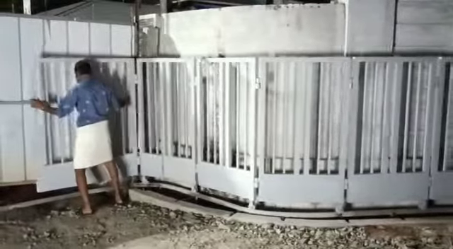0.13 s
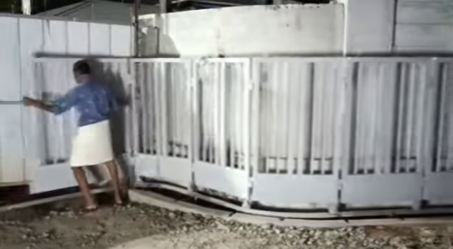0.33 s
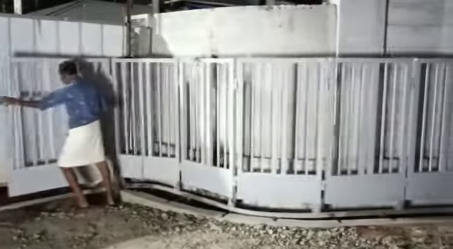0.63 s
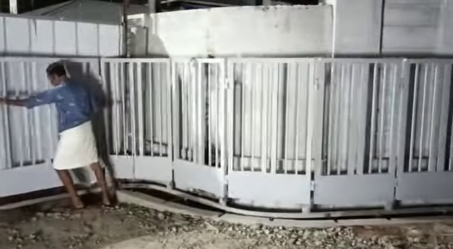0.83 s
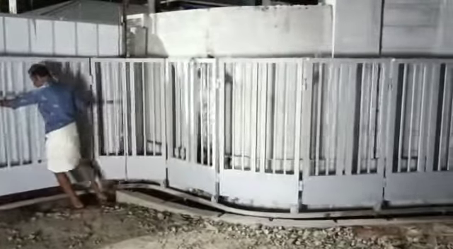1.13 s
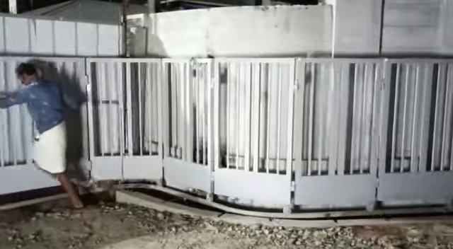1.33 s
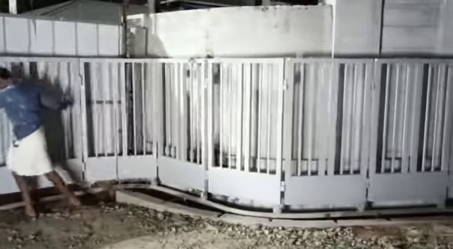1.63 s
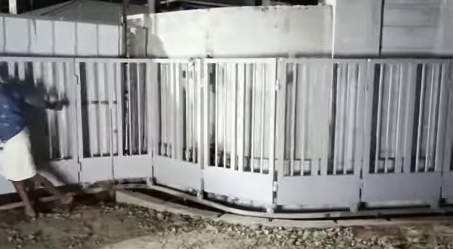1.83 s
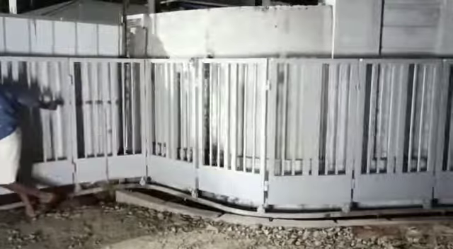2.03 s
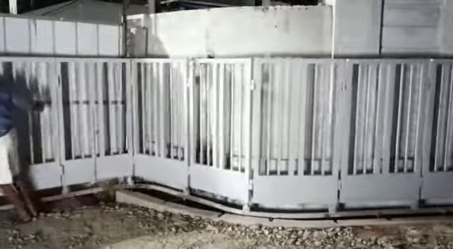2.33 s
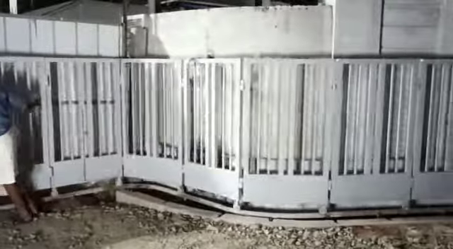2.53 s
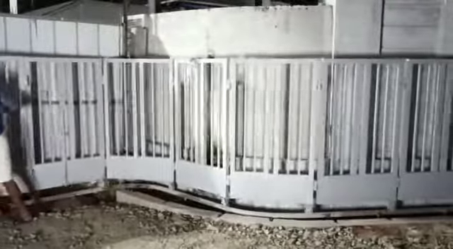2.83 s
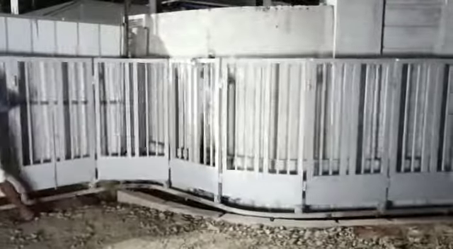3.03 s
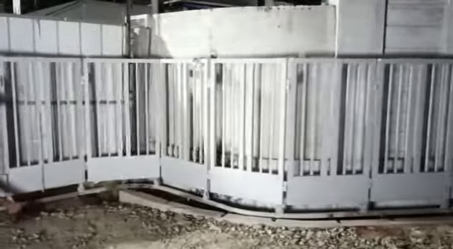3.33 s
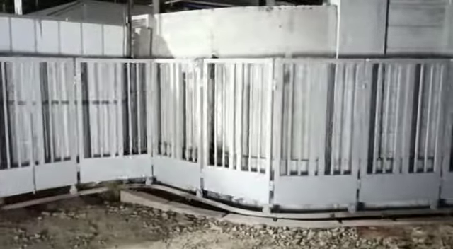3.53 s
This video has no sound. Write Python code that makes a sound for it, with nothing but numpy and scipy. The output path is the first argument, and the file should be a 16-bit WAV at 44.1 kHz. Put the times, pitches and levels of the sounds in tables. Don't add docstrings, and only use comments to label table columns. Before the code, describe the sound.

A steel folding gate is pulled along a ground rail outdoors at night, wheels rumbling and bars rattling; small jolts lead to a hard clank, then louder rolling, heard by a phone a few metres away.

```python
import sys
import numpy as np
from scipy import signal
from scipy.fft import rfft, irfft
from scipy.io import wavfile
from scipy.ndimage import uniform_filter1d

SR = 44100
rng = np.random.default_rng(int(sys.argv[2]) if len(sys.argv) > 2 else 0)


def rack_gain(trim_db):
    fader = np.asarray(trim_db, float)
    return 10 ** (fader / 20)


def materialize(psi):
    bounded = np.clip(np.atleast_2d(psi).T, -1, 1)
    quanta = np.round(bounded * 32767).astype(np.int16)
    wavfile.write(sys.argv[1], SR, quanta)


N = 162288

# frequency in Hz, density in dB per Hz.
NIGHT_AIR = [(30, -20), (55, -23), (80, 8.5), (110, -13), (500, -8.5), (3300, -29), (8600, -64)]
# time in seconds, wheel rumble in dB, frame roar in dB, chatter in dB.
ROLLING = [(0, -34, -51, -48.5), (.1, -41, -51.5, -48.5), (.28, -36.5, -46, -48), (.67, -36, -43.5, -45.5),
           (.95, -36, -44, -45), (1.2, -35.5, -46, -50), (1.55, -37, -43, -47), (1.8, -39, -46.5, -50.5),
           (2.0, -36.5, -43, -44.5), (2.15, -32.5, -42, -44.5), (2.46, -31.5, -37.5, -39),
           (2.55, -32, -38, -43), (2.9, -30.5, -38.5, -40.5), (3.129, -32, -39, -44),
           (3.4, -29.5, -37.5, -39), (3.68, -29, -35.5, -40)]
# frequency in Hz, width in Hz, level in dB.
SHEET_MODES = [(102.5, 22, -5.5), (142, 21, -2), (169.9, 18.4, 0), (196.4, 18, -1), (231, 27.3, 1),
               (281.8, 22, -2), (332, 20.6, -2.5), (360.7, 18.5, -2.5), (395.5, 37.4, -1), (449.3, 18, -9)]
# frequency in Hz, width in Hz, level in dB.
FRAME_MODES = [(631, 90, -3.5), (742, 146, -1.5), (840.5, 92, 0), (878.5, 30, -1.5), (1014, 83, -5),
               (1119, 18.4, -7), (1205, 79, -7.5)]
# frequency in Hz, width in Hz, level in dB.
PANEL_MODES = [(1362, 530, 1.5), (1490, 81, 1.5), (1670, 75, -3), (1808, 49, -0.5), (1902, 160, 1.5),
               (2234, 160, -3), (2313, 41, -4.5), (2398, 130, -3), (2574, 60, -5), (2738, 34, -8.5)]
# frequency in Hz, width in Hz, level in dB.
BAR_MODES = [(2930, 310, 0.5), (3220, 59, 1), (3443, 72, 1), (3504, 230, 1.5), (3823, 250, 3.5),
             (4103, 70, -1.5), (4296, 67, -2.5), (4635, 150, -1), (5110, 590, -6), (6090, 400, -6.5)]
# frequency in Hz, width in Hz, level in dB.
PIN_MODES = [(6270, 100, -12), (6395, 85, 1.5), (6810, 110, 4), (7070, 130, -5.5), (7330, 63, 2),
             (7340, 28, 5), (7510, 240, 2), (8380, 190, -3)]
CHATTER_LEVELS = [-1, -5.5, -12]
SHAKE_LEVELS = [-10, -7.5, -9]
# start in seconds, panel, bar and pin levels in dB, shake decay (time to fall 95 dB) in
# seconds.
JOINT_JOLTS = [(0.2998, -36.5, -40.5, -54, 0.36), (0.3313, -40, -41, -52, 0.21),
               (0.4437, -38, -40.5, -48.5, 0.5), (0.67, -43, -42, -42, 0.39),
               (0.692, -34, -40, -50.5, 0.27), (0.8162, -48, -43.5, -46.5, 0.57),
               (1.022, -42, -37.5, -44.5, 0.66), (1.0862, -44, -39.5, -45, 0.21),
               (1.191, -37, -46.5, -51, 0.22), (1.286, -36, -44, -55.5, 0.36), (1.575, -41, -44, -56, 0.37),
               (2.544, -42.5, -41.5, -47, 0.24), (1.3636, -37.5, -42, -46, 0.3),
               (1.5252, -40, -40.5, -42.5, 0.4), (1.6466, -39, -37, -36.5, 0.38),
               (1.926, -31.5, -32.5, -34.5, 0.47), (2.2432, -17.5, -23.5, -27.5, 0.44),
               (2.295, -27, -39.5, -32, 0.72), (2.3675, -32, -29, -34, 0.44),
               (2.5668, -51, -35, -38.5, 0.42), (2.65, -34.5, -36, -38.5, 0.57),
               (2.8683, -31.5, -32.5, -36.5, 0.48), (2.931, -35, -32.5, -32.5, 0.21),
               (3.218, -29.5, -34.5, -41.5, 1), (3.3645, -28, -36, -29.5, 0.28),
               (3.4697, -41, -33, -41, 0.24), (3.587, -40, -31, -33, 0.4)]
BLOW_LEVELS = [-9, -4, 0]
# centre in seconds, frequency in Hz, level in dB,
# length in seconds.
SHEET_BOOMS = [(.312, 164, -47, 0.18), (0.673, 221, -45.5, .15), (1.551, 202, -41, .15),
               (1.605, 398, -40.5, .1), (1.846, 194, -42, 0.21), (2.083, 293, -36, 0.062),
               (2.153, 212, -43.5, 0.2), (2.29, 818, -39.5, 0.11), (2.299, 355, -35.5, .12),
               (2.43, 231, -33.5, .1), (2.485, 178, -34, 0.092), (2.657, 334, -35, 0.092),
               (2.684, 400, -39.5, 0.2), (2.752, 285, -36.5, 0.047), (2.806, 170, -36, 0.18),
               (2.91, 326, -31, 0.056), (2.947, 243, -31.5, 0.11), (3.06, 328, -34, 0.11),
               (3.174, 415, -37.5, .08), (3.228, 188, -31.5, 0.053), (3.381, 140, -34.5, .2),
               (3.401, 888, -39, 0.073), (3.425, 196, -31, 0.15), (3.493, 164, -33.5, 0.14),
               (3.584, 229, -43, .12), (3.635, 657, -37.5, 0.068), (3.636, 334, -31.5, .07),
               (3.673, 184, -29, .06)]
# start in seconds, level in dB, struck place as its loudest Hz,
# reach in octaves.
FORK_KNOCKS = [(1.6, -38, 2200, 0.091), (1.651, -39.5, 1670, 0.049), (1.677, -40, 1710, 0.21),
               (2.2421, -16, 2200, 2), (2.2466, -20.5, 2300, 0.12), (2.26, -26, 1670, .1),
               (2.285, -26.5, 1800, 0.87), (2.367, -28.5, 3020, 0.41), (3.193, -33.5, 2140, 0.32),
               (3.222, -30, 850, 0.31), (3.374, -28.5, 2160, 0.24), (2.252, -25.5, 1139, 0.38),
               (2.24, -32.5, 2700, 0.088), (2.261, -27, 2040, .08), (1.662, -40, 2300, .08),
               (3.405, -33.5, 2130, 0.23), (.335, -47, 3600, .3)]
# frequency in Hz, width in Hz, level in dB.
FORK_MODES = [(880, 130, 5), (1140, 33, 1.5), (1480, 40, -6), (1665, 15, 2), (1766, 48, 5),
              (1980, 14, -8.5), (2040, 20, -4), (2217, 45, -9), (2330, 46, -1), (2650, 60, -8),
              (2707, 16, -8.5), (3530, 30, -6), (3900, 67, -3.5), (4105, 20, -4)]
# start in seconds, level in dB, length in seconds.
PIN_SCRAPES = [
    (.445, -44.5, 0.015),
    (0.667, -41.5, .018),
    (0.701, -40, 0.02),
    (1.644, -34, 0.025),
    (2.241, -26, .012),
    (3.361, -34, 0.015),
    (3.37, -29, 0.019),
    (2.87, -42.5, 0.028),
    (3.588, -43.5, 0.012),
]
# frequency in Hz, width in Hz, level in dB.
SCRAPE_MODES = [(6520, 260, -5), (6840, 66, -9), (7330, 250, 5.5), (7920, 250, -0.5), (8415, 130, -3)]
# start in seconds, level in dB, length in seconds.
FRAME_RAPS = [
    (2.366, -27, 0.011),
    (2.711, -32.5, .009),
    (3.216, -39, 0.011),
    (1.926, -38.5, 0.019),
]
# frequency in Hz, likeness from 0 to 1.
STEREO_LIKENESS = [(60, .98), (250, 0.98), (500, 0.74), (2000, 0.043)]
# frequency in Hz, left minus right in dB.
STEREO_LEAN = [(1290, 0), (2380, -3), (4400, -1), (8120, 2.5), (12000, -9)]
# frequency in Hz, level in dB.
TOP_BAND = [(11600, 0), (12700, -9), (13000, -2.5), (15300, -3)]

DETUNE, COLOUR_DB = .008, 3
EDGE_HZ = 8620


def evened(x):
    return x / np.sqrt(np.mean(x ** 2) + 1e-20)


def read(points, hz):
    f, value = np.transpose(points)
    return np.interp(np.log(hz + 1), np.log(f + 1), value)


def effort(column):
    rows = np.array(ROLLING)
    return rack_gain(np.interp(np.arange(N) / SR, rows[:, 0], rows[:, column]))


def wander(hz):
    t = np.arange(N) / SR
    rates = hz * np.geomspace(.1, 1, num=16)
    return evened(sum(np.sin(2 * np.pi * (f * t + rng.random())) / np.sqrt(f) for f in rates))


def ring(modes, detune=0., colour_db=0.):
    hz, width, db = np.transpose(modes)[:, :, None]
    t = np.arange(4096) / SR
    colour, shift = rng.standard_normal((2, len(modes), 1))
    sign = (-1.) ** np.arange(len(modes))[:, None]
    level = sign * np.sqrt(width) * rack_gain(db + colour_db * colour)
    decay = np.exp(-np.pi * width * t)
    out = (level * decay * np.sin(2 * np.pi * hz * (1 + detune * shift) * t)).sum(0)
    return out / np.linalg.norm(out)


def through(drive, modes):
    return signal.oaconvolve(drive, ring(modes)[None])[:, :N]


def add_at(out, start_s, sound):
    at = int(start_s * SR)
    out[:, at:at + sound.shape[1]] += sound


def night():
    hz = np.fft.rfftfreq(N, 1 / SR)
    air = rfft(rng.standard_normal((2, N)), axis=1) * rack_gain(read(NIGHT_AIR, hz))
    return rack_gain(-45) * evened(irfft(air, N, axis=1))


def wheels():
    lumps, swells = rng.standard_normal((2, 2, N))
    rumble = evened(through(lumps * rack_gain(.7 * wander(hz=29.76)), SHEET_MODES))
    roar = evened(through(swells * rack_gain(1.2 * wander(hz=24.98)), FRAME_MODES))
    return effort(column=1) * rumble + effort(column=2) * roar


def chatter():
    ticks_per_s, tick_spread_db, grit_db, flutter_db, shake_curve = 1100, 3.5, 3, 1.8, 1.5
    t, out = np.arange(N) / SR, np.zeros((2, N))
    for k, modes in enumerate([PANEL_MODES, BAR_MODES, PIN_MODES]):
        power = (effort(column=3) * rack_gain(CHATTER_LEVELS[k] + flutter_db * wander(hz=20))) ** 2
        for row in JOINT_JOLTS:
            start, shake_s = row[0], row[4]
            fall_db = 95 * (np.abs(t - start) / shake_s) ** shake_curve
            power = power + (t > start) * rack_gain(row[k + 1] + SHAKE_LEVELS[k] - fall_db) ** 2
        strength = rack_gain(tick_spread_db * rng.exponential(1, (2, N)))
        ticks = (rng.random((2, N)) < ticks_per_s / SR) * strength * rng.choice([-1, 1], (2, N))
        drive = evened(ticks) + rack_gain(grit_db) * rng.standard_normal((2, N))
        out += through(evened(drive) * np.sqrt(power), modes)
    return out


def clanks():
    decay_s, rise_s = [.1, .076, .066], [.0087, .0067, .0036]
    grain_db = 3
    t, out = np.arange(3072) / SR, np.zeros((2, N + 8192))
    for row in JOINT_JOLTS:
        for k, modes in enumerate([PANEL_MODES, BAR_MODES, PIN_MODES]):
            grain = 13 * uniform_filter1d(rng.standard_normal(len(t)), size=36)
            blow = evened(rng.standard_normal((2, len(t))) * rack_gain(grain_db * grain))
            fall = rack_gain(row[k + 1] + BLOW_LEVELS[k] - 60 * t / decay_s[k])
            blow = blow * np.minimum(t / rise_s[k], 1) * fall
            add_at(out, row[0], signal.fftconvolve(blow, ring(modes, DETUNE, COLOUR_DB)[None]))
    return out[:, :N]


def booms():
    t, out = np.arange(N) / SR, np.zeros((2, N))
    waver = np.cumsum(1 + .012 * wander(hz=20)) / SR
    for centre, hz, db, length in SHEET_BOOMS:
        swell = np.exp(-2.77 * ((t - centre) / length) ** 2)
        out += rack_gain(db + 2) * swell * np.sin(2 * np.pi * (hz * waver + rng.random((2, 1))))
    return out


def knocks():
    side_db, rise_s = -15, .003
    out, hz = np.zeros((2, N + 8192)), np.array(FORK_MODES)[:, 0]
    for start, db, place_hz, reach in FORK_KNOCKS:
        modes = np.array(FORK_MODES)
        modes[:, 2] -= 6 * (np.log2(hz / place_hz) / max(reach, .05)) ** 2
        pair = np.array([ring(modes), rack_gain(side_db) * ring(modes, .004, 4.1)])
        rise = np.minimum(np.arange(pair.shape[1]) / SR / rise_s, 1)
        add_at(out, start, rack_gain(db + 27) * rise * pair)
    return out[:, :N]


def contacts(table, modes):
    t, out = np.arange(2048) / SR, np.zeros((2, N + 8192))
    for start, db, length in table:
        swell = np.sin(np.pi * np.minimum(t / length, 1) ** .71)
        snap = rng.standard_normal((2, len(t))) * rack_gain(db + 1) * swell
        add_at(out, start, signal.fftconvolve(snap, ring(modes, DETUNE, COLOUR_DB)[None]))
    return out[:, :N]


def pin_scrapes():
    return contacts(PIN_SCRAPES, SCRAPE_MODES)


def bar_raps():
    return contacts(FRAME_RAPS, PANEL_MODES[-2:] + BAR_MODES[1:-2])


def spread(pair):
    hz = np.fft.rfftfreq(N, 1 / SR)
    same, lean = read(STEREO_LIKENESS, hz), rack_gain(read(STEREO_LEAN, hz) / 2)
    a, b = rfft(pair, axis=1)
    mid, side = np.sqrt((1 + same) / 2) * a, np.sqrt((1 - same) / 2) * b
    return irfft([(mid + side) * lean, (mid - side) / lean], N, axis=1)


def scene():
    gate = wheels() + chatter() + clanks() + booms() + knocks() + pin_scrapes() + bar_raps()
    return spread(night() + gate)


def treble_power(z, hz):
    band = irfft(z * ((hz > 4500) & (hz < EDGE_HZ)), N, axis=1)
    power = uniform_filter1d(band ** 2, size=256, axis=1)
    return np.abs(power).mean(0)[None] / power.mean() + 1e-9


def top_hiss(treble, hz):
    cells = signal.stft(rng.standard_normal((2, N)), nperseg=1024)[2]
    fine = uniform_filter1d(rng.standard_normal(cells.shape), size=8, axis=1)
    broad = uniform_filter1d(rng.standard_normal(cells.shape), size=12, axis=1)
    broad = uniform_filter1d(broad, size=4, axis=2)
    cells = cells * rack_gain(4.5 * evened(fine + 2 * broad))
    hiss = evened(signal.istft(cells, nperseg=1024)[1][:, :N])
    linger = uniform_filter1d(np.minimum(treble, 4), size=4096, origin=2000, axis=1)
    hiss = hiss * np.sqrt(1.6 + treble ** 1.45 + 1.9 * linger ** 2)
    return rfft(hiss, axis=1) * rack_gain(-62 + read(TOP_BAND, hz)) * ((hz > 11600) & (hz < 15300))


def edge_leak(dry, treble, hz):
    leak = rfft(dry * treble ** 1.99, axis=1) * (hz > EDGE_HZ) * rack_gain(-62.5 - .015 * (hz - EDGE_HZ))
    gate = uniform_filter1d(1. * (wander(hz=25) > .8), size=512)
    spill = rfft(rng.standard_normal(dry.shape) * gate, axis=1)
    return leak + spill * (hz > EDGE_HZ) * (hz < EDGE_HZ + 700) * rack_gain(-62)


def low_pass(x):
    return signal.sosfilt(signal.butter(12, 15600, fs=SR, output="sos"), x)


def record(dry):
    hz, z = np.fft.rfftfreq(N, 1 / SR), rfft(dry, axis=1)
    treble = treble_power(z, hz)
    bass_cut = np.maximum(1 / np.sqrt(1 + (74 / (hz + 1)) ** 11.0), rack_gain(-17))
    body = z * (hz < EDGE_HZ) * bass_cut
    mix = irfft(body + edge_leak(dry, treble, hz) + top_hiss(treble, hz), N, axis=1)
    return low_pass(mix)


dry = scene()
out = record(dry)
materialize(out)
```